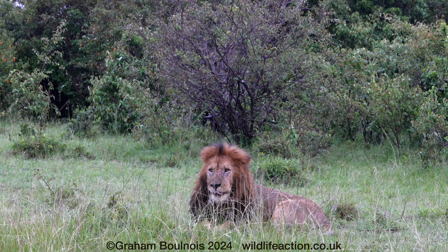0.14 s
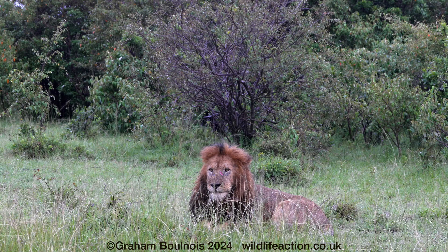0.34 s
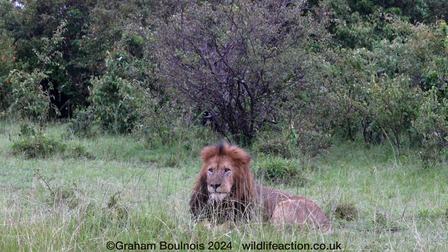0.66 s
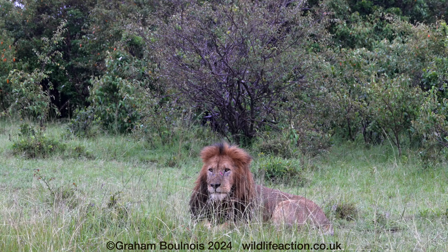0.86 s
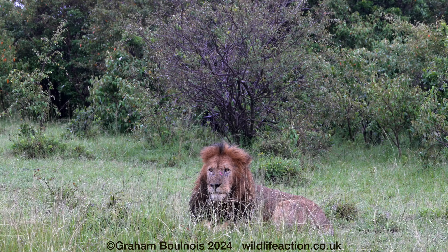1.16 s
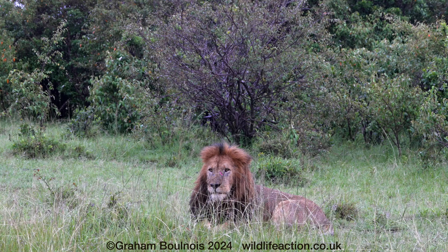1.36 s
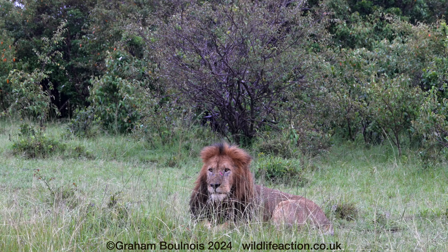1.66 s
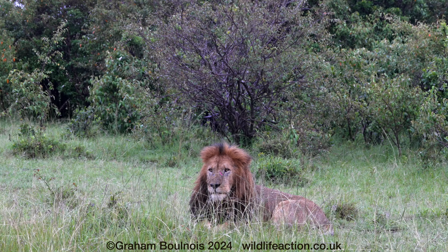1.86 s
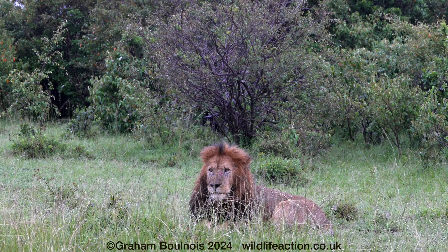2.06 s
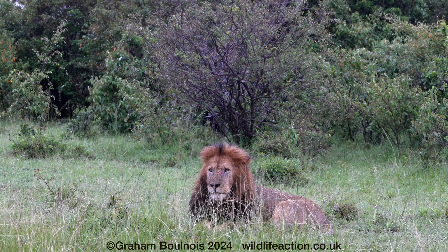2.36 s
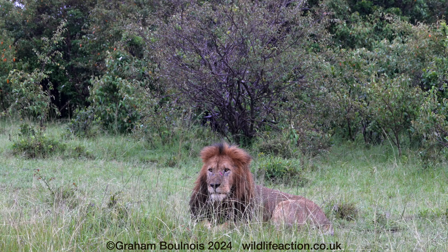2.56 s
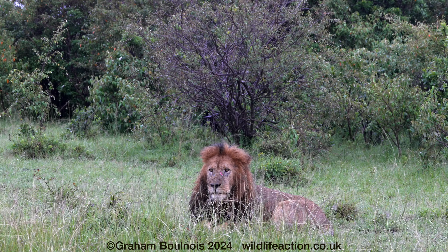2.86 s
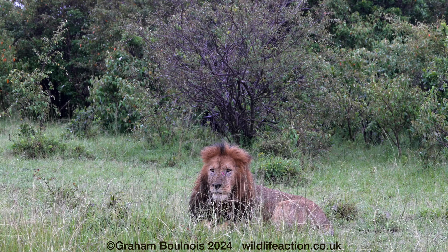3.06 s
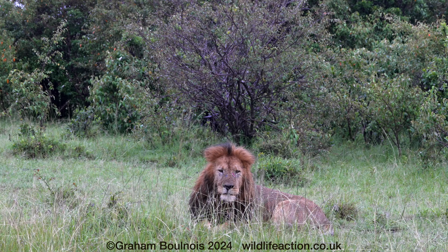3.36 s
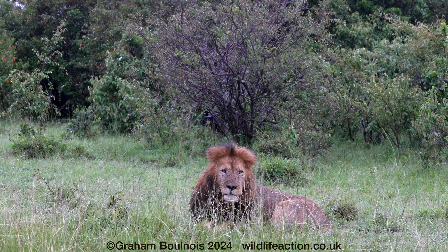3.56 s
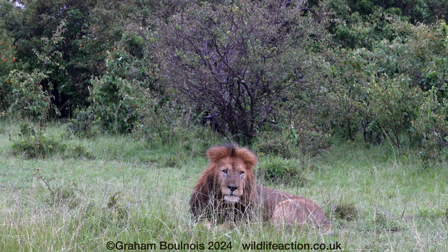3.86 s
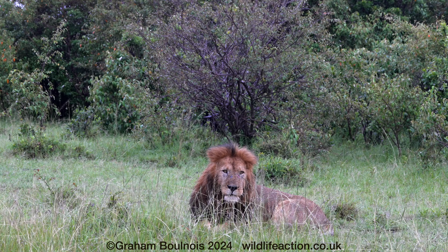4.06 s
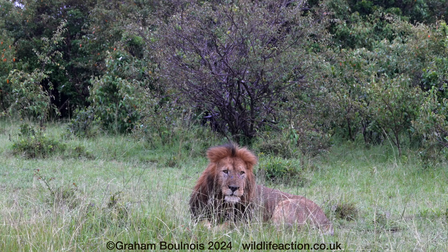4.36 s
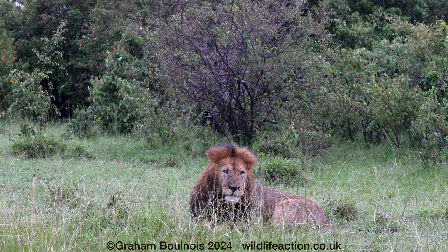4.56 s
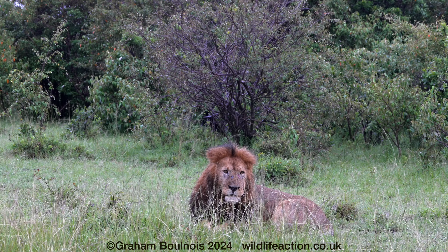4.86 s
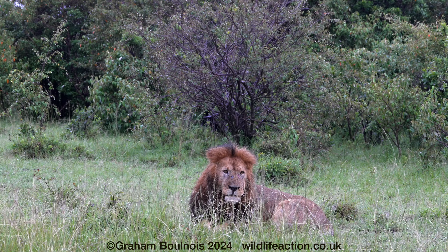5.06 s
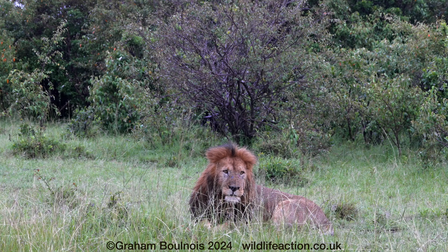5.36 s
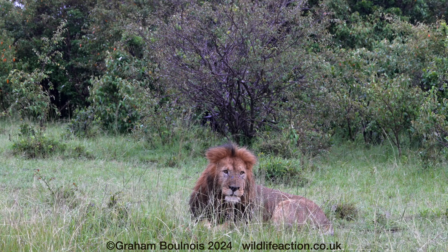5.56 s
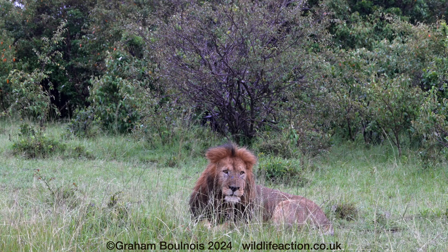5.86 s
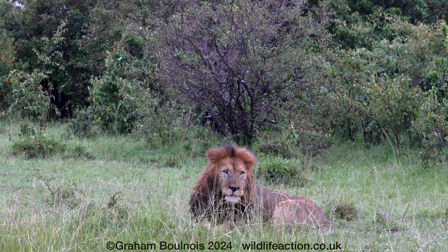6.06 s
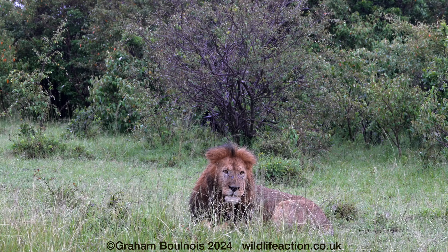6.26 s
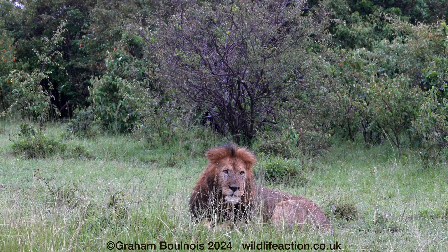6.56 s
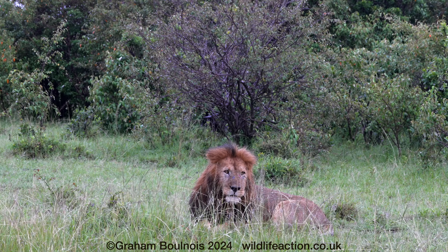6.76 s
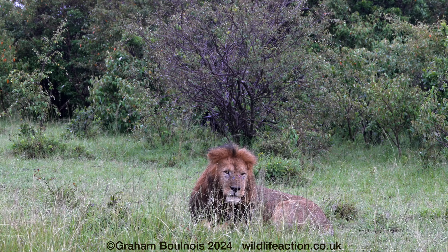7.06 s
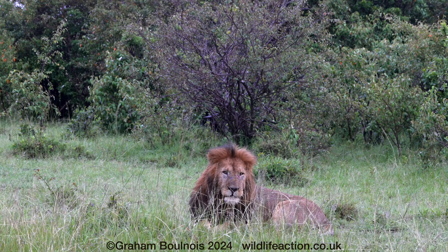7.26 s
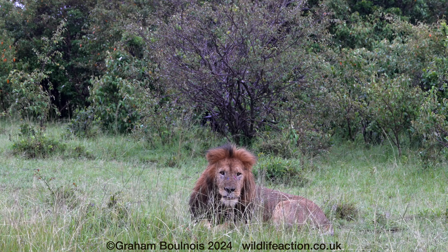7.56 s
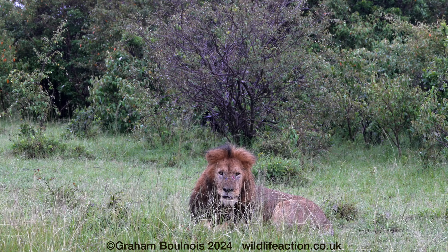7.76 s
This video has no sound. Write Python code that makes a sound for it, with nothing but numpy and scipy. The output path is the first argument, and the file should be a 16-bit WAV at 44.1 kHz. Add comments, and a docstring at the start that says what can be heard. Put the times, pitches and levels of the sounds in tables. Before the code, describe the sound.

Outdoors in soft rain, a lion gives six low roars, each breaking into rasp, and ends on a rattling, snore-like groan amid faint bird chips.

```python
"""A deep roar, already under way, breaks up; an equally long roar, shorter ones and a snoring groan follow.
The lion's tissue slaps excite resonances of chest, throat, mouth and nose; far bush returns a faint echo.
Light rain is shaped noise and ringing drops; birds whistle in gliding sines, and a frog or cricket trills.
One microphone feeds the left input; the right input carries only hiss and a trace of mains hum.
Source levels are relative to one another: the input adds two equal copies, 6 dB more."""
import sys
import numpy as np
from scipy import signal
from scipy.io import wavfile
from scipy.ndimage import uniform_filter1d

SR = 44100
rng = np.random.default_rng(int(sys.argv[2]) if len(sys.argv) > 2 else 0)


def unload_audio(sound):
    """Save the sound as a 16-bit wav file, at the path given as the first command line argument."""
    columns = np.transpose(np.atleast_2d(sound))
    # keep every value between -1 and 1, then stretch to whole-number steps
    steps = np.round(np.clip(columns, -1, 1) * 32767)
    wavfile.write(sys.argv[1], SR, steps.astype(np.int16))


def amplitude_ratio(level_db):
    """Convert a level in decibels to the matching linear amplitude (field) ratio."""
    exponent = np.asarray(level_db, float) / 20
    return 10 ** exponent


N = 349255

# Spectrum of the steady background: distant rain and air, with the roars' lingering echo near 183 Hz:
# (frequency [Hz], relative density [dB per Hz])
WASH_SPECTRUM = [(15, -43), (25, -13.5), (75, 4), (136, -3), (183, 0), (305, -11), (421, -7.5),
                 (482, -11.5), (1800, -15), (2170, -16.5), (4150, -22.5), (7100, -30.5), (15500, -48)]
# Level of the small drops together: (time [s], level [dB])
RAIN_LEVEL = [(0.0, -63), (0.77, -68), (1.369, -65.5), (2.199, -65), (2.73, -65), (3.0, -60.5),
              (3.3, -64.5), (4.41, -62.5), (4.83, -69), (5.12, -62), (5.319, -58.5), (5.58, -68),
              (6.6, -63.5), (6.81, -59), (7.15, -64), (7.72, -64.5), (7.92, -73)]
# Spectrum of the small drops: (frequency [Hz], relative density [dB per Hz])
DROP_SPECTRUM = [(150, -18.5), (500, 0), (1100, 3.5), (1800, 6), (3000, 4), (5000, -14), (8000, -33.5),
                 (13000, -52)]
# Large drops near the microphone: (time [s], ring level [dB], ring frequency [Hz])
BIG_DROPS = [(0.1257, -61, 1740), (0.323, -43.5, 1700), (0.388, -46, 3110), (0.4897, -51, 3160),
             (0.5445, -41, 1430), (0.5856, -46.5, 1700), (0.6802, -38.5, 2480), (0.8116, -57.5, 1350),
             (0.8435, -53.5, 1778), (0.9617, -45, 1730), (1.0889, -60, 1370), (1.1355, -45, 1420),
             (1.5608, -50.5, 1150), (1.7, -43, 1150), (1.928, -44.5, 1850), (1.9972, -43.5, 1710),
             (2.0718, -44, 1810), (2.189, -45, 1880), (2.3467, -40, 1750), (2.464, -38, 1750),
             (2.5928, -46, 1550), (2.8416, -45.5, 1930), (2.8944, -41, 1580), (2.9456, -47, 1380),
             (3.2991, -38.5, 2240), (3.5574, -44, 1580), (3.6125, -54, 1150), (3.8313, -47, 1170),
             (3.8952, -44, 4120), (4.2777, -49, 1160), (4.4347, -41.5, 1710), (4.9662, -42.5, 1780),
             (4.9895, -42, 1830), (5.4995, -44.5, 1700), (5.5682, -50.5, 2370), (5.8072, -46, 1940),
             (5.8502, -44.5, 1770), (5.9459, -43, 1510), (6.116, -41.5, 1890), (6.403, -45, 1610),
             (6.6957, -43, 2170), (6.736, -40, 2160), (7.0843, -43, 2190), (7.6505, -46.5, 1860),
             (7.7405, -42, 1800)]
# Soft treble hiss: (centre time [s], half length to 1/e [s], level [dB])
SWELLS = [(0.397, 0.024, -60.5), (1.6, 0.091, -68.5), (3.006, 0.2, -67.5), (5.32, 0.17, -67.5),
          (6.85, 0.24, -71.5), (7.25, 0.29, -71)]
# Bands of that hiss, before a common frequency factor: (frequency [Hz], width [Hz], relative level [dB])
SWELL_BANDS = [(3100, 1500, -3), (4900, 1600, 0), (7000, 3000, -12)]
# Trill of a frog or cricket: (time [s], frequency [Hz], level [dB])
TRILL = [(6.33, 2380, -71), (6.45, 2203, -64.5), (6.9, 2160, -63), (6.97, 2210, -71), (7.1, 2190, -76),
         (7.4, 2220, -74), (7.47, 2280, -67)]
# Bird whistles and low hoots, each a straight glide:
# (start [s], length [s], first frequency [Hz], last frequency [Hz], level the swell ends at [dB])
WHISTLES = [(1.12, 0.075, 515, 520, -68), (1.381, .065, 4500, 3500, -60), (1.454, 0.019, 3050, 2550, -56.5),
            (1.472, 0.034, 3900, 3250, -61.5), (1.49, 0.04, 2814, 2810, -59),
            (3.46, 0.017, 5050, 4200, -59), (3.468, 0.068, 5900, 5100, -70),
            (3.494, 0.018, 5080, 4180, -56.5), (3.573, 0.19, 4720, 3900, -65.5),
            (3.722, 0.065, 713, 696, -62), (3.852, 0.13, 4070, 4160, -67.5),
            (3.991, 0.096, 4160, 3480, -60.5), (4.09, 0.045, 3680, 3470, -72),
            (4.536, 0.14, 5780, 4400, -66.5), (4.937, 0.082, 5350, 4600, -63.5),
            (6.125, 0.077, 356, 361, -62), (6.62, 0.084, 3260, 2600, -67), (6.98, .05, 3440, 2900, -61.5),
            (7.013, 0.026, 4440, 4140, -59.5)]
# Short falling chips of a small bird: (time [s], peak level [dB])
CHIPS = [(0.172, -54.5), (0.44, -60), (0.6371, -59), (0.6957, -58), (0.9455, -57), (1.143, -60),
         (1.1992, -56), (3.0036, -58.5), (5.2415, -57.5), (5.3474, -55), (6.0671, -61), (6.5919, -55.5),
         (6.627, -60), (6.8505, -60), (6.9122, -62), (7.0998, -57), (7.3487, -59), (7.401, -60.5)]
# Groan: (time [s], chest resonance [Hz], chest level [dB], throat level [dB],
# frequency factor [ratio], lower as throat and mouth lengthen)
GROAN = [(6.62, 160.2, -56, -51.5, 0.99), (6.73, 168, -59, -44.5, .99), (6.8, 219, -47.5, -41.5, 0.94),
         (6.96, 206, -53.5, -49, 0.82), (7.005, 200, -59, -54, 0.84), (7.06, 182, -53, -49.5, 0.84),
         (7.24, 145, -45, -48.5, .8), (7.37, 121.3, -39.5, -56, .81), (7.45, 101, -50, -59, 0.84),
         (7.519, 98, -62, -70, 0.65)]
# Throat and mouth resonances in the groan, before that factor: (frequency [Hz], width [Hz], level [dB])
GROAN_THROAT = [(509, 83, -3), (638, 57, -2.5)]
GROAN_MOUTH = [(847, 52, 1), (1002, 92, 7), (1280, 70, -6)]
# Flaps of the soft palate: (centre time [s], peak level [dB], half length to 1/e [s])
FLAPS = [(7.064, -39.5, .018), (7.106, -35.5, .015), (7.141, -31, .018), (7.179, -26.5, .013),
         (7.204, -30.5, .013), (7.25, -28, .022), (7.316, -25, .022), (7.385, -36, .024), (7.45, -42, .022)]
# Roars: (start [s], time held until the voice breaks [s], voice level once risen [dB],
# voice level at the break [dB], top pitch [Hz], time until the rasp is full [s])
ROARS = [(-.5, .52, -32.5, -32.5, 180.6, 0.19), (1.25, .53, -29.5, -29.5, 181.6, 0.34),
         (2.84, 0.41, -27, -28.5, 176.6, 0.1), (4.12, 0.23, -24, -31.5, 177.7, 0.039),
         (5.21, .25, -23.5, -30.5, 174.9, .12), (6.311, 0.21, -23.5, -31.5, 176.1, 0.11)]
# Throat resonances at a pitch of 172 Hz: (frequency [Hz], width [Hz], level [dB])
THROAT = [(254.2, 49.4, 4), (372.2, 46, 2), (472, 110, -1), (579.7, 50, 0), (649.2, 23.4, -2),
          (755.6, 56, -8.5), (848, 49, -6), (1001.4, 110, -18)]
# Overtones of the clear voice: (multiple of the pitch [ratio], relative level [dB])
OVERTONES = [(2, 3.5), (3, 9.5), (4, 1), (5, 10.5), (6, -15.5), (7, -29.5)]


def evened(x):
    """Power normalisation: scales to rms 1."""
    return x / np.sqrt(np.mean(x ** 2) + 1e-20)


def steadied(x, s):
    """Automatic gain: evens out the short-time power over spans of s seconds."""
    return x / np.sqrt(uniform_filter1d(x ** 2, round(s * SR)) + 0.13 * np.mean(x ** 2))


def wander(length, hz):
    """Low-pass filtered noise: a slow random course of rms 1, up to hz."""
    lowpass = signal.butter(2, hz, fs=SR, output="sos")
    return evened(signal.sosfilt(lowpass, rng.standard_normal(length + SR))[SR:])


def read(points, hz):
    """Logarithmic interpolation: reads a spectrum on a log-frequency axis."""
    f, value = np.transpose(points)
    return np.interp(np.log(hz + 1), np.log(f + 1), value)


def played(rows):
    """Linear interpolation: sample times and every column joined by straight lines."""
    s, *columns = np.transpose(rows)
    t = np.arange(s[0], s[-1], 1 / SR)
    return t, [np.interp(t, s, c) for c in columns]


def tone(hz):
    """Phase integration: a sine whose instantaneous frequency follows hz."""
    return np.sin(2 * np.pi * np.cumsum(hz) / SR)


def bump(t, centre, half):
    """Gaussian envelope: peak 1 at the centre, 1/e at the half length."""
    return np.exp(-((t - centre) / half) ** 2)


def add(mix, s, sound):
    """Superposition: mixes a sound in at time s."""
    part = mix[round(s * SR):][:len(sound)]
    part += sound[:len(part)]


def resonate(x, hz, width):
    """Heterodyne resonance: shifts hz down to zero, smooths twice and shifts back, with gain 1 at hz."""
    turn = np.exp(2j * np.pi * np.cumsum(hz * np.ones(len(x))) / SR)
    r = np.exp(-np.pi * width / SR)
    return 2 * (turn * signal.lfilter([(1 - r) ** 2], [1, -2 * r, r * r], x / turn + 1e-18)).real


def ring(beat, modes, factor):
    """Modal sum: parallel resonances of alternating sign, their frequencies scaled by a factor."""
    return sum((-1) ** k * amplitude_ratio(db) * resonate(beat, hz * factor, width)
               for k, (hz, width, db) in enumerate(modes))


def wash():
    """Filtered noise as a steady background: random short-time spectra with drifting patches."""
    frames, hz = N // 256 + 5, np.fft.rfftfreq(1024, 1 / SR)[:, None]
    a, b, patches = rng.standard_normal((frames, 513, 3)).T
    patches = evened(uniform_filter1d(uniform_filter1d(patches, 20, 0), 8, 1))
    # the patches are shallower in the treble and bass
    depth_db = 4.9 / (1 + (hz / 5000) ** 2 + (300 / (hz + 150)) ** 2)
    z = (a + 1j * b) * amplitude_ratio(read(WASH_SPECTRUM, hz) + depth_db * patches)
    return amplitude_ratio(-59.5) * evened(signal.istft(z, nperseg=1024, noverlap=768)[1][:N])


def splash(hz, ring_s, spray_s, tick_db):
    """Damped oscillation of one drop: a ring of amplitude about 1, a tick and a spray of noise."""
    t = np.arange(2600) / SR
    tick, spray = rng.standard_normal((2, len(t)))
    sound = np.sin(2 * np.pi * hz * t) * np.exp(-t / ring_s) * np.minimum(t / 0.00041, 1)
    sound += 0.18 * evened(resonate(spray, hz, 1.21 * hz)) * np.exp(-t / spray_s)
    return sound + amplitude_ratio(tick_db) * np.diff(tick, prepend=0) * np.exp(-t / .002)


def small_drops():
    """Shot noise: random impulses excite thirty kinds of drop on leaves and canvas."""
    drops_per_s = 260
    size = amplitude_ratio(3.6 * np.minimum(rng.exponential(1, N), 3.3)) * (rng.random(N) < drops_per_s / SR)
    kind, small = rng.integers(0, 30, N), np.zeros(N)
    for k, hz in enumerate(np.geomspace(350, 9000, 30)):
        drop = splash(hz, 1.6 / hz, 0.013, -49.5)
        drop /= np.linalg.norm(drop)
        # sqrt(hz): each kind stands for a band as wide as its frequency is high
        small += amplitude_ratio(read(DROP_SPECTRUM, hz)) * np.sqrt(hz) * signal.oaconvolve(size * (kind == k), drop)[:N]
    return evened(small) * amplitude_ratio(np.interp(np.arange(N) / SR, *np.transpose(RAIN_LEVEL)))


def rain():
    """Superposed impacts: many small drops, the large ones, and weaker ones at random."""
    out = small_drops()
    more_per_s, low_hz, high_hz = 16, 1150, 5000
    when, size, pitch = rng.random((round(more_per_s * N / SR), 3)).T
    more = zip(when * N / SR, -57.5 + 13.0 * (size - .5), low_hz * (high_hz / low_hz) ** pitch)
    ring_cycles, spray_cycles = 2.43, 23  # decay lengths in cycles of the ring
    for s, db, hz in [*BIG_DROPS, *more]:
        tick_db = -75 - db + 3.5 * rng.standard_normal()  # all ticks are about equally loud
        add(out, s, amplitude_ratio(db) * splash(hz, ring_cycles / hz, spray_cycles / hz, tick_db))
    return out


def swells():
    """Band-passed noise under Gaussian envelopes: a treble hiss that rises and falls softly."""
    t = np.arange(N) / SR
    level = sum(amplitude_ratio(db) * bump(t, s, half) for s, half, db in SWELLS)
    return level * evened(ring(rng.standard_normal(N), SWELL_BANDS, 0.9))


def trill():
    """Amplitude modulation: a frog's or cricket's unsteady sine pulses 27 times a second."""
    out = np.zeros(N)
    t, (hz, db) = played(TRILL)
    hz = hz * (1 + .008 * wander(len(t), 40))
    db = db + 3 * wander(len(t), 12)
    add(out, t[0], amplitude_ratio(db) * tone(hz) * (1 + np.sin(2 * np.pi * 27 * t)))
    return out


def birds():
    """Frequency glides: near-sine whistles that swell to their end, falling chips, and a short echo."""
    out = np.zeros(N)
    swell_db_per_s = 43
    for s, length, first_hz, last_hz, db in WHISTLES:
        t = np.arange(0, length, 1 / SR)
        hz = np.interp(t, [0, length], [first_hz, last_hz]) * (1 + 0.0089 * wander(len(t), 150))
        level = amplitude_ratio(db - swell_db_per_s * (length - t)) * signal.windows.tukey(len(t), .3)
        add(out, s, level * tone(hz))
    chip_length = round(0.008 * SR)
    chip = tone(np.linspace(5550, 3960, chip_length)) * signal.windows.tukey(chip_length, .7)
    for s, db in CHIPS:
        add(out, s, amplitude_ratio(db) * chip)
    tail = rng.standard_normal(6000) * amplitude_ratio(-60 * np.arange(6000) / SR / .2)  # falls at 60 dB per 0.2 s
    return out + amplitude_ratio(-5) * signal.oaconvolve(out, tail / np.linalg.norm(tail))[:N]


def slaps(turns, chaos, skip_db, breath):
    """Relaxation pulses: tissue slaps once a turn; chaos shifts, resizes and weakens every second one."""
    count = np.floor(np.maximum.accumulate(turns + .45 * chaos * wander(len(turns), 70)))
    size_db = chaos * (3.5 * rng.standard_normal(len(turns)) - skip_db * (count % 2))
    pulses = evened(np.diff(count, prepend=count[0]) * amplitude_ratio(size_db))
    return pulses + breath * chaos * rng.standard_normal(len(turns))


def groan():
    """Source and filter on drawn air: palate flaps sound the nose, slaps ring chest, throat and mouth."""
    t, (chest_hz, chest_db, throat_db, factor) = played(GROAN)
    beat = slaps(90 * (t - t[0]), 0.95, 2.0, 2.0)  # 90 turns a second
    nose_hz = 336
    flaps = sum(amplitude_ratio(db) * bump(t, s, half) for s, db, half in FLAPS)
    nose = flaps * tone(nose_hz * (1 + .03 * wander(len(t), 20)))
    # the nose also hums between the flaps
    hum_level = amplitude_ratio(-50.5) * bump(t, 7, 0.3) + amplitude_ratio(-59)
    nose += hum_level * steadied(resonate(beat, nose_hz, 30), 0.069)
    throat = steadied(ring(beat, GROAN_THROAT, factor), 0.08)
    mouth = steadied(ring(beat, GROAN_MOUTH, factor), 0.08)
    chest = steadied(resonate(beat, chest_hz, 40), 0.05)
    chest += amplitude_ratio(-13.5) * steadied(resonate(beat, chest_hz / 2, 25), 0.11)  # the octave below
    return amplitude_ratio(chest_db) * chest + nose + amplitude_ratio(throat_db) * (throat + amplitude_ratio(-8.5) * mouth)


def roar_pitch(t, held, top_hz):
    """Exponential approach: pitch [Hz] climbs to the top, slower in long roars, and sinks at the break."""
    first_hz, broken_hz, sink_s = 154.8, 152.1, .035
    climb_s = .04 + .14 * held
    climbing = top_hz - (top_hz - first_hz) * np.exp(-t / climb_s)
    return climbing - (top_hz - broken_hz) * np.clip((t - held) / sink_s, 0, 1)


def roar_rasp(beat, t, hz, held, spent, swell):
    """Modal excitation: slaps ring throat and mouth, and the spent breath narrows to one band."""
    # the throat lengthens a little as the pitch sinks
    rasp = ring(beat, THROAT, (hz / 172) ** .25 * (1 + .012 * wander(len(t), 5)))
    # the slower the rasp swells, the clearer the mouth rings
    mouth_hz = np.interp(t, [.8 * held, held], [473.3, 425])
    rasp += amplitude_ratio(-10 + 61 * swell) * (1 - spent) ** 2 * resonate(beat, mouth_hz, 28.5)
    return rasp + amplitude_ratio(11.5) * spent ** 2 * resonate(beat, 449, 62)


def roar(start, held, risen_db, break_db, top_hz, swell):
    """Onset of chaos: a nearly pure voice breaks into slaps, with throat rasp and chest rumble."""
    fade = .21 + .06 * held  # the voice runs out later in long roars [s]
    t = np.arange(0, held + fade, 1 / SR)
    spent = np.clip((t - held) / fade, 0, 1)

    rise_s = .012 + 0.028 * held
    onset_db = -23.5 * bump(t, 0, 2 * rise_s)
    end_db = np.interp(t, [t[-1] - 0.058, t[-1]], [0, -13.5])  # the throat closes
    end_db = end_db + 5 * np.sqrt(spent) * wander(len(t), 20)  # the spent breath comes in lumps
    voice_db = end_db + onset_db + np.interp(t, [0, held], [risen_db, break_db]) - 25 * spent
    # the rasp swells, outlasts the break, then fades
    rasp_db = np.interp(t, [0, swell, held + 0.04, held + fade], [-12.5, 0, 0, -18])
    rasp_db = end_db + 0.54 * onset_db - 37 + rasp_db
    rumble_db = -52 - 20 * ((t - held - .06) / .23) ** 2  # an arch that peaks after the break

    hz = roar_pitch(t, held, top_hz)
    # roughness, 0 to 1: start, clear share of the rasp's swell, full rasp, break, broken
    rough = np.interp(t, [0, .24 * swell, swell, held, held + .09], (.03, .04, .13, .33, .92))
    turns = np.cumsum(hz * (1 + 0.022 * rough * wander(len(t), 53))) / SR
    clear = np.sin(2 * np.pi * turns) * amplitude_ratio(5.9 * rough * wander(len(t), 42))
    beat = slaps(turns, np.sqrt(rough), 6.7, 0.37)  # the closures lose order sooner than the voice
    broken = steadied(resonate(beat, hz, 67), 0.036)
    voice = np.sqrt(2 * (1 - rough ** 2)) * clear + rough * broken

    rasp = roar_rasp(beat, t, hz, held, spent, swell)
    overtones = evened(sum(amplitude_ratio(db) * np.sin(2 * np.pi * k * turns) for k, db in OVERTONES))
    hoarse = np.clip(rough / .07, .25, 1)  # the overtones are the first to dissolve
    upper = hoarse * steadied(rasp, 0.028) + np.sqrt(1 - hoarse ** 2) * overtones
    chest_hz = np.interp(spent, [0, 1], (85, 62))  # full effort to spent breath
    rumble = steadied(resonate(beat, chest_hz, 30), 0.036)
    return amplitude_ratio(voice_db) * voice + amplitude_ratio(rasp_db) * upper + amplitude_ratio(rumble_db) * rumble


def lion():
    """Diffuse reflection: all calls, convolved with decaying noise for the long echo of far bush."""
    calls = np.zeros(N + SR)  # starts one second early: the first roar and its echo are under way
    for row in ROARS:
        sound = roar(*row)
        add(calls, 1 + row[0], sound * signal.windows.tukey(len(sound), .03))
    sound = groan()
    add(calls, 1 + GROAN[0][0], sound * signal.windows.tukey(len(sound), .05))
    t = np.arange(2 * SR) / SR
    # falls at 60 dB per 4.5 s and sets in gradually from 0.15 s
    far = rng.standard_normal(len(t)) * amplitude_ratio(-60 * t / 4.5) * np.clip((t - .15) / .3, 0, 1)
    echo = signal.fftconvolve(calls, far / np.linalg.norm(far))[:len(calls)]
    dull = signal.sosfilt(signal.butter(2, [120, 260], "bandpass", fs=SR, output="sos"), echo)
    return (calls + amplitude_ratio(-29.5) * dull + amplitude_ratio(-38) * echo)[SR:]


def scene():
    """Superposition: everything reaches the one microphone, given as two equal copies."""
    heard = wash() + rain() + swells() + trill() + birds() + lion()
    return np.array([heard, heard])


def band_limit(x):
    """A steep low-pass at the top of the band."""
    return signal.sosfilt(signal.butter(12, 15930, fs=SR, output="sos"), x)


def record(dry):
    """Additive noise: the summed sound lands on the left; both inputs add hiss and a trace of mains hum."""
    hiss = amplitude_ratio(-75) * rng.standard_normal((2, N))
    hum = amplitude_ratio(-106) * np.sin(2 * np.pi * 50 * np.arange(N) / SR)
    bass_cut = signal.butter(2, 45, "highpass", fs=SR, output="sos")
    left = signal.sosfilt(bass_cut, dry.sum(0))
    mix = hiss + hum + np.array([left, np.zeros(N)])
    return band_limit(mix)


dry = scene()
out = record(dry)
unload_audio(out)
```